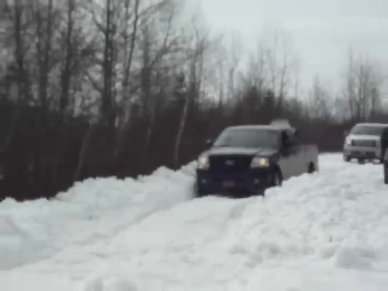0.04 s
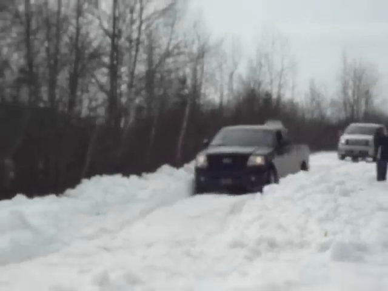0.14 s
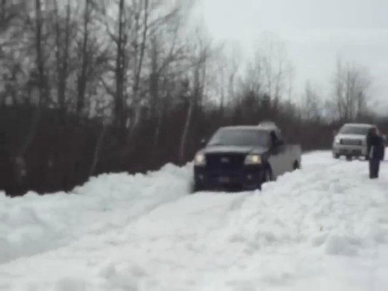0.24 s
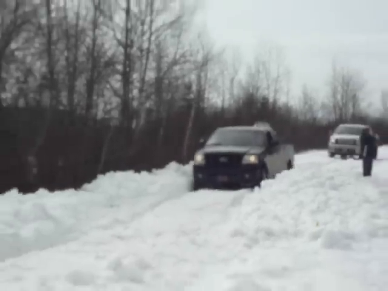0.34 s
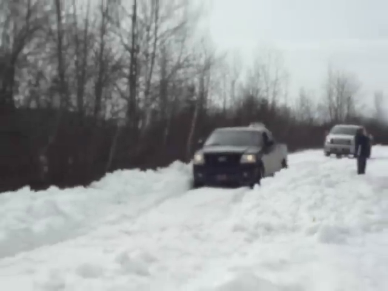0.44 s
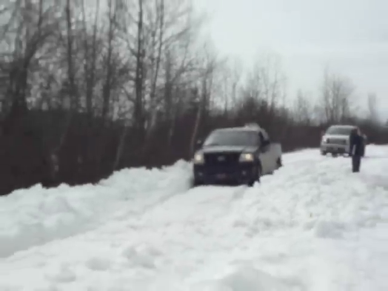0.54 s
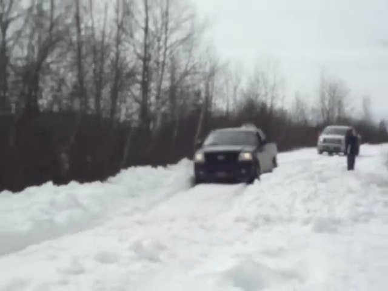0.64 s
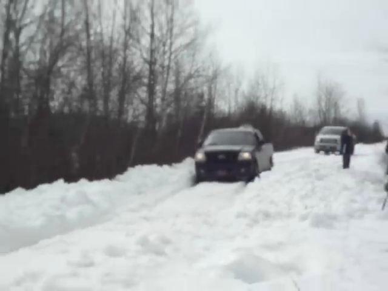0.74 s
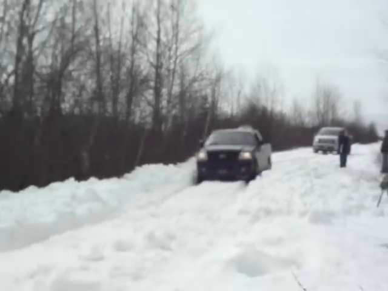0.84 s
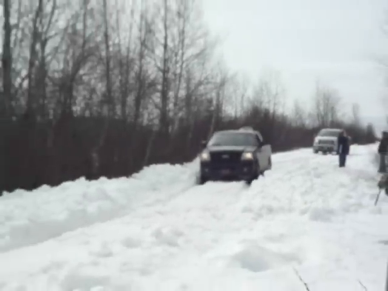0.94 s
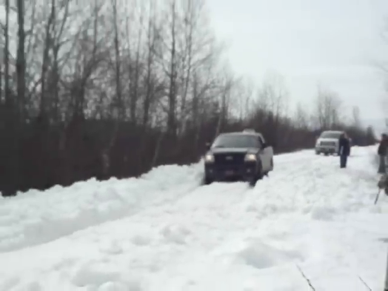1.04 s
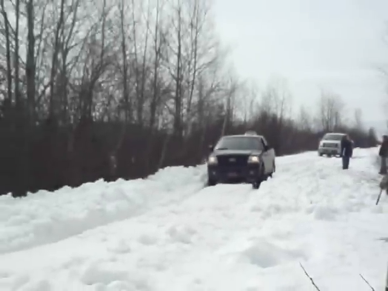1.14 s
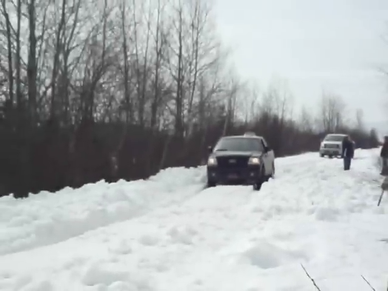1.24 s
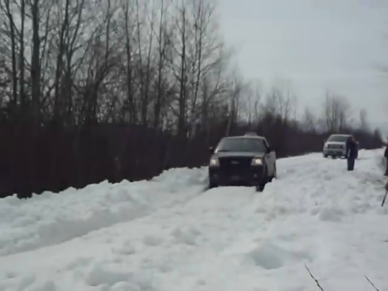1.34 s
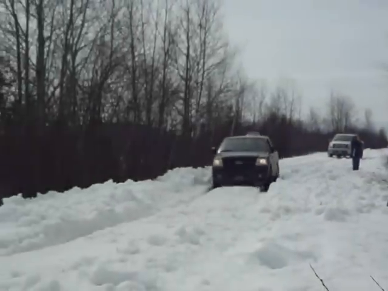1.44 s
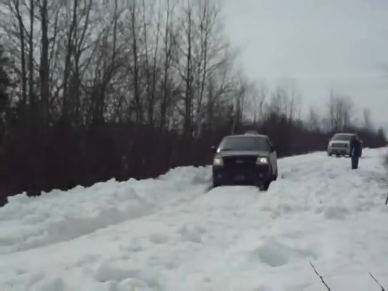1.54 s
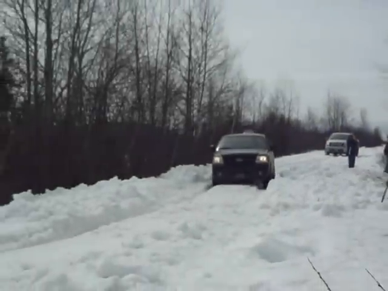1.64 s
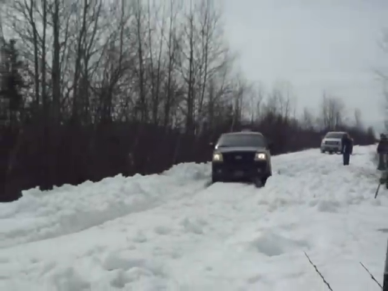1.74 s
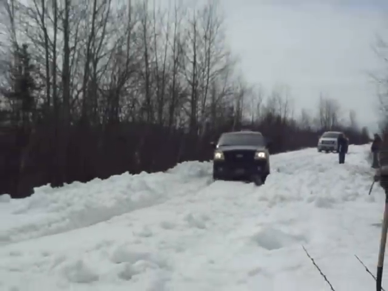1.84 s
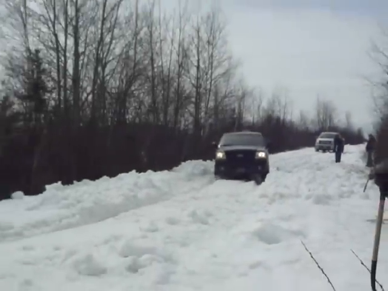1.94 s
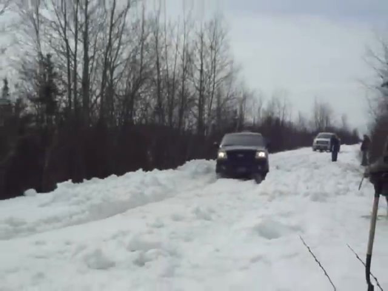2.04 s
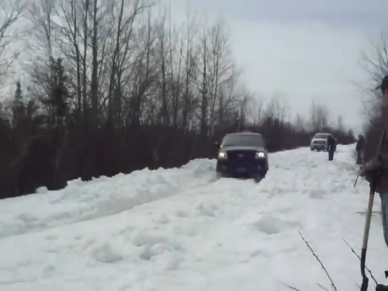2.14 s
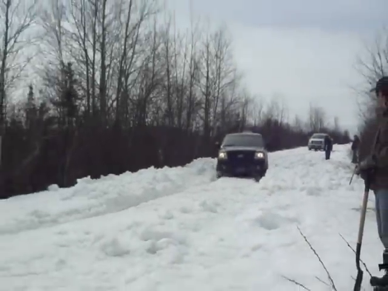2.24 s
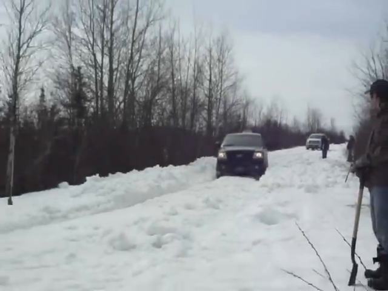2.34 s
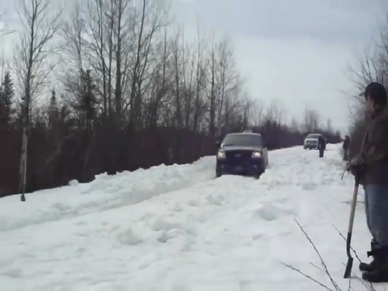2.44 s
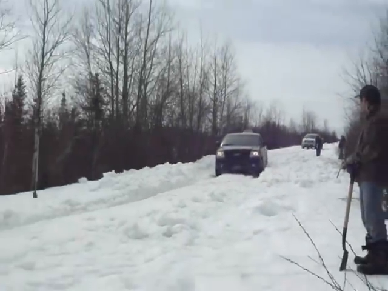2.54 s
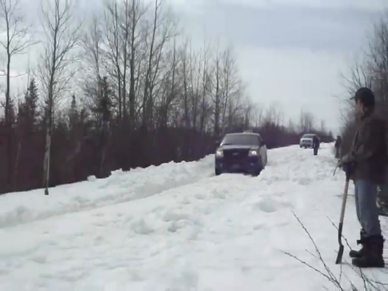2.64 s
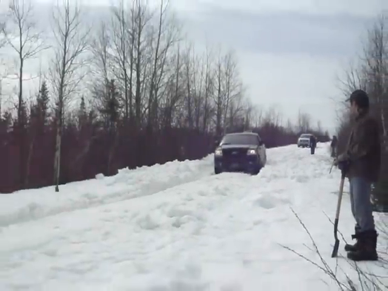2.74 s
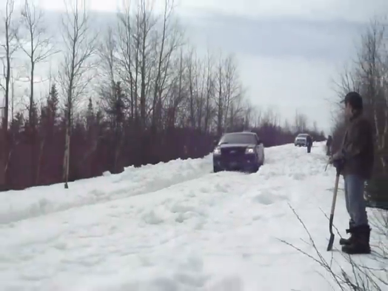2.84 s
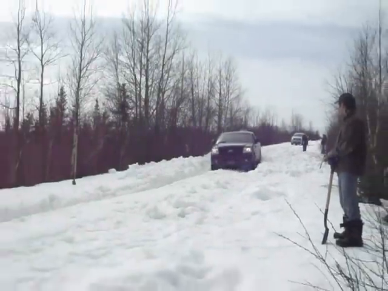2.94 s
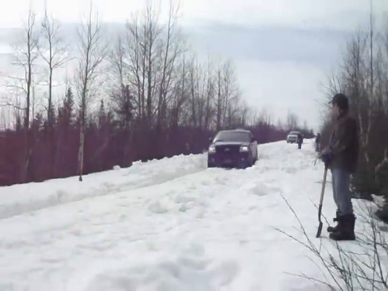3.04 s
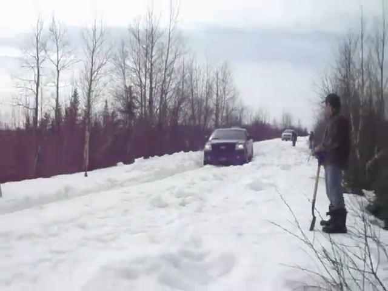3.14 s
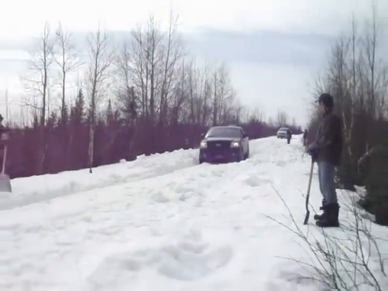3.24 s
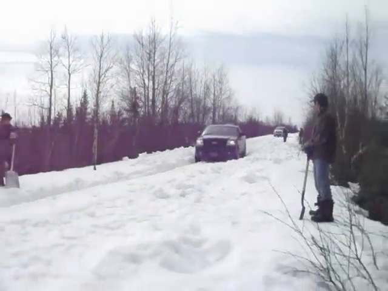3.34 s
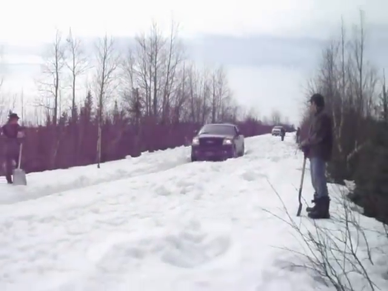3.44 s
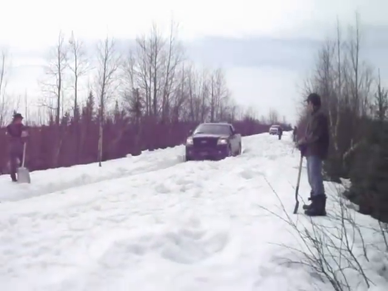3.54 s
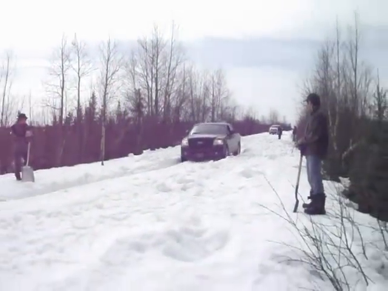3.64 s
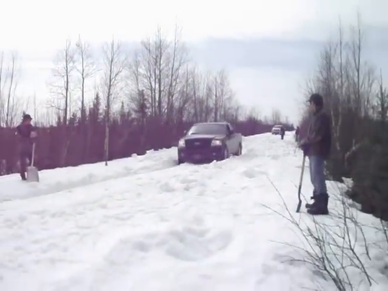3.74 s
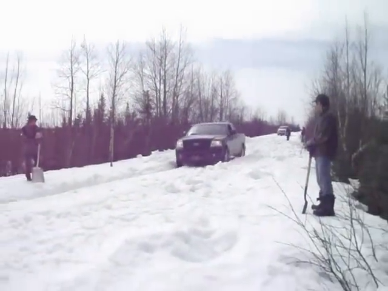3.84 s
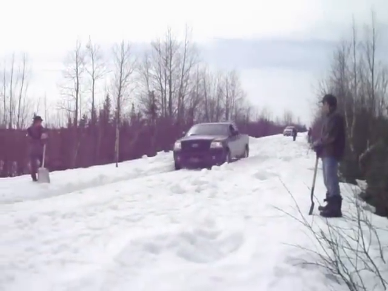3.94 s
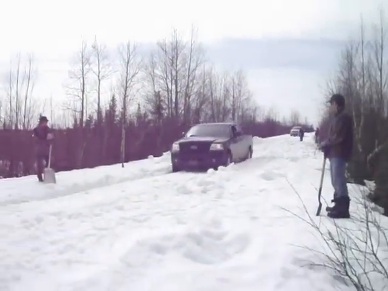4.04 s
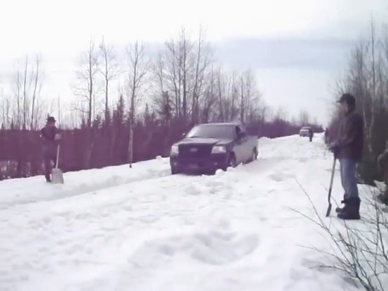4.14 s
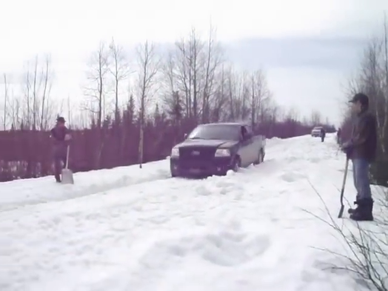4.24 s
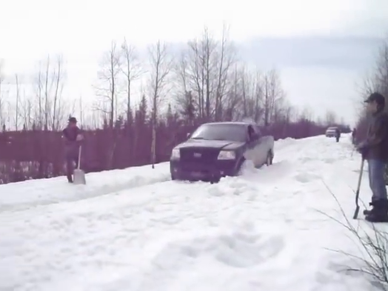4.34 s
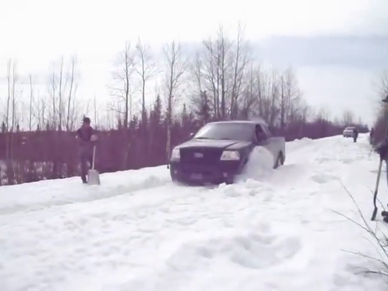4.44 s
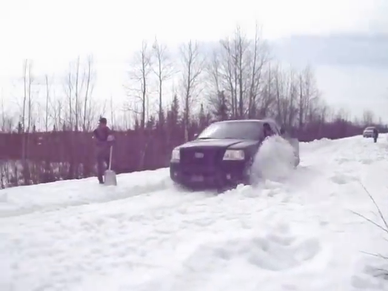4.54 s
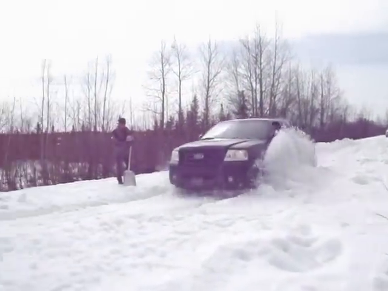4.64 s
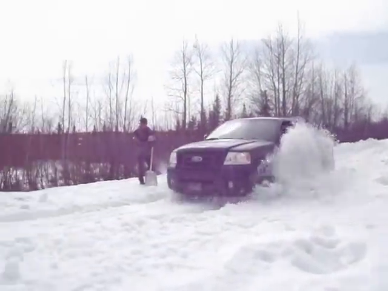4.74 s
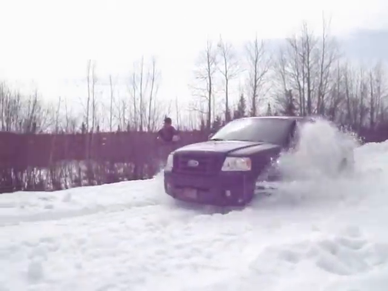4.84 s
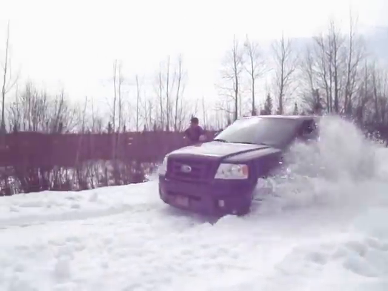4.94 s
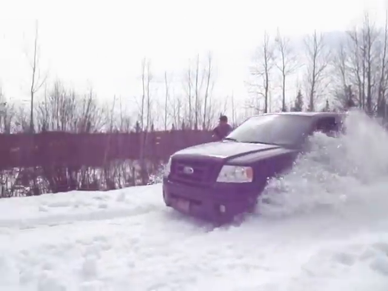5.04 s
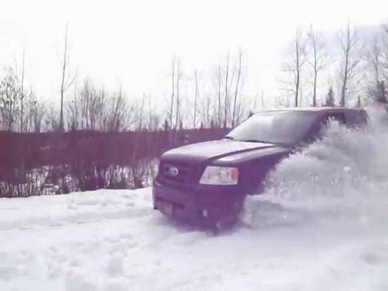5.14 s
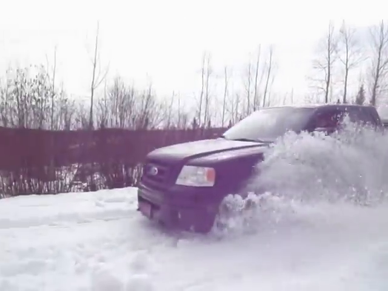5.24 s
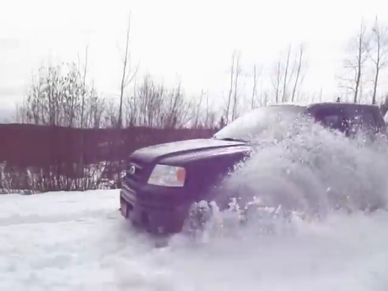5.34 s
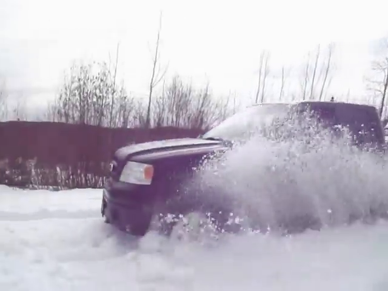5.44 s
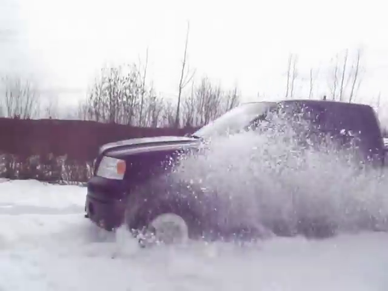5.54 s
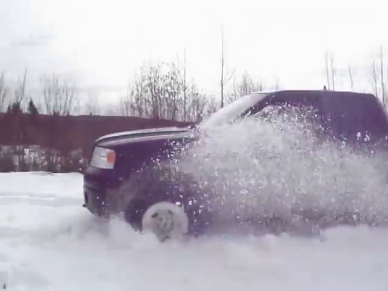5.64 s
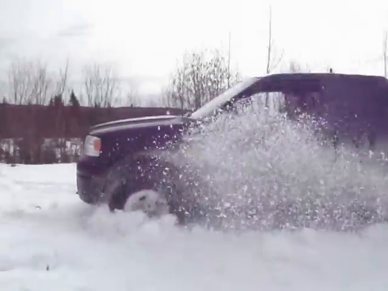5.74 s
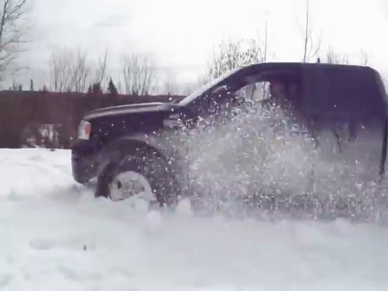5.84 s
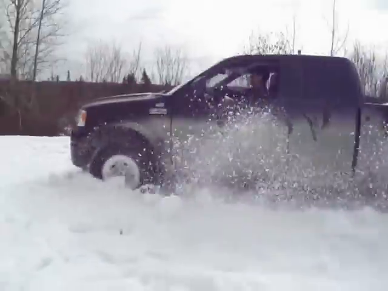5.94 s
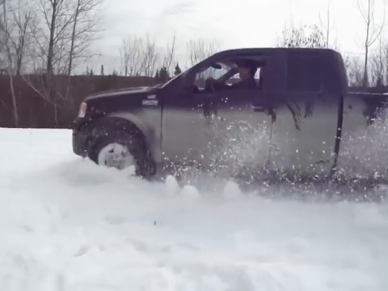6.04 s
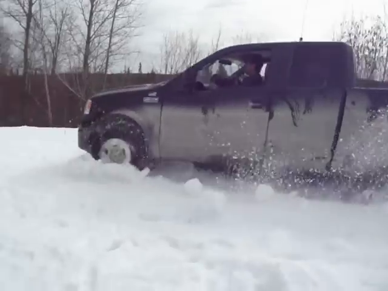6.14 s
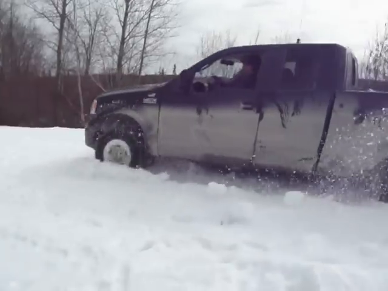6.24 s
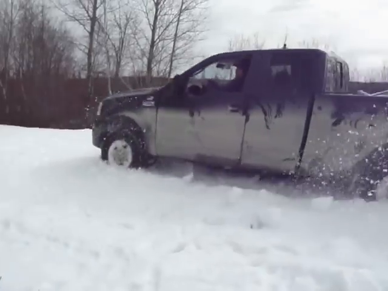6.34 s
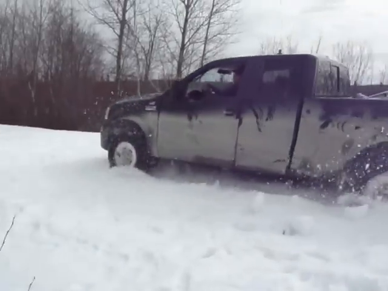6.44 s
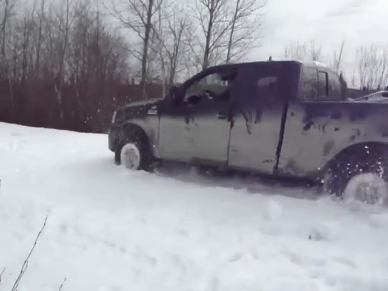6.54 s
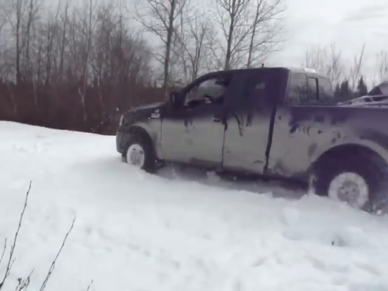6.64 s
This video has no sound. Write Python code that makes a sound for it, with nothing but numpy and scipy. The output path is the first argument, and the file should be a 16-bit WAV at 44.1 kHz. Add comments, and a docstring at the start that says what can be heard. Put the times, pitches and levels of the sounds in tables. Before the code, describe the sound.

A pickup truck's engine drones under load in the distance, heard outdoors through a hand-held camera with a slightly dull sound and a faint whirr. The zoom motor buzzes close up for the first second and again from 1.5 to 3.9 seconds. Small plastic clicks and finger taps come around 1, 1.5, 2.7 to 3.3, and 4 seconds. Meanwhile the engine climbs steadily in pitch and grows louder, reaching its highest note near 4.7 seconds. Low wind buffets the microphone from about 3.8 seconds. Churning, crunching and hissing snow swells, with faint, thin tyre slips around 4.5, 4.8 and 5.7 seconds. The truck passes very close and is loudest from about 5 to 6 seconds. Ice crumbs spatter on the camera at 5.9 seconds, followed by a brief gust. The engine sags in pitch, still close and throaty, until the end near 6.7 seconds.

```python
"""A pickup passing in deep snow

A V8 ploughs close past a hand-held camera, its exhaust harmonics climbing and sagging with the firing
rate. The wheels churn, crush and spray snow as noise and tiny impacts; ice hits the camera and wind
buffets the microphone. The zoom gears buzz twice, and lever and fingers excite the resonances of the case."""
import sys
import numpy as np
from scipy import signal
from scipy.fft import rfft, irfft, next_fast_len
from scipy.io import wavfile

SR = 44100
rng = np.random.default_rng(int(sys.argv[2]) if len(sys.argv) > 2 else 0)


def pcm_store(signal):
    """Save signal as 16-bit PCM."""
    levels = np.round(np.clip(np.atleast_2d(signal), -1, 1) * 32767)
    wavfile.write(sys.argv[1], SR, levels.astype(np.int16).T)


N = 295470
TIME = np.arange(N) / SR
# spectrum of hissing snow: (frequency [Hz], level [dB])
SNOW_HISS = [(900, -20.5), (1500, -9), (1800, -9.5), (2020, -5.5), (2250, -4), (2600, 0), (2900, -0.5),
             (3150, -4.5), (3500, -8.5), (4000, -18), (4500, -25.5), (5000, -36), (6500, -48.5)]


def engine(roughness_db=1.23, octave_db=-13.5):
    """Harmonic series: eight firings a cycle make the note; their unevenness adds other cycle orders."""
    # engine speed: (time [s], firing rate [Hz])
    firing_rate = [(0, 118), (.5, 122), (1.05, 134), (1.6, 137), (2.0, 144), (2.4, 144.5), (2.8, 149.5),
                   (3.37, 153.8), (3.55, 160.5), (3.8, 162), (4.1, 172), (4.35, 172), (4.68, 183),
                   (5.0, 180), (5.45, 180), (6.05, 171), (6.3, 165.5), (6.7, 164)]
    # lope of the two cylinder banks: (order [multiple of the four-stroke cycle], level [dB])
    lope_orders = [(3, 1.5), (5, -1.5), (9, 2), (10, -1.5), (12, -5), (13, -5), (14, -8.5), (15, -8.5)]
    # drones as grille, flank and tailpipe face the camera: (order, time [s], half length [s], level [dB])
    drones = [(30, 3.95, .25, -49), (14, 4.15, .26, -36), (21, 4.2, .22, -45), (35, 4.4, .35, -45),
              (9, 4.92, .26, -32), (11, 5.15, .35, -36), (8, 5.6, .18, -26), (16, 5.7, .2, -36),
              (10, 5.95, .35, -30), (5, 6.2, .35, -22), (3, 6.3, .12, -26), (13, 6.35, .5, -32.5),
              (15, 6.45, .22, -30)]
    # strongest overtones of the engine: (order, level [dB])
    overtones = [(10, -5), (12, -1), (13, -1), (16, -4), (21, -2), (24, -2), (26, 1), (29, -4), (30, -4),
                 (31, -1), (32, -5), (35, -4)]
    # resonances of the pipe and of the panels: (frequency [Hz], bandwidth [Hz], level [dB])
    pipe_modes = [(442, 15, -7), (574, 51, 1.5), (703, 67, 2), (881, 33, 5.5), (1100, 290, -2.5),
                  (1280, 41, -2)]
    panel_modes = [(226, 20, -3), (260, 22, -1), (301, 18, 0), (450, 14, -5), (494, 17, 1.5),
                   (586, 30, -1.5), (638, 30, -1), (690, 20, -1), (758, 40, -1)]
    # radiating points: (behind the nose [m], level [dB], loss per distance doubling [dB], load factor)
    note_source = (3.5, -26.5, 9, 1.22)
    lope_source = (3.5, -25, 12, 1.45)
    rasp_source = (2.7, -26, 16, 0.7)
    whine_source = (1, -9.5, 19, -0.2)
    firing_hz, = in_time(firing_rate)
    cycle_phase = 2 * np.pi * np.cumsum(firing_hz * (1 + 0.00407 * drift(8.0))) / SR / 8
    phases = rng.uniform(0, 2 * np.pi, size=64)

    def partial(order, waver_db):
        """One harmonic of the cycle under slow amplitude modulation; rms 1."""
        tone = np.sin(round(order) * cycle_phase + phases[round(order)])
        return rms_one(from_db(waver_db * drift(2.8)) * tone)

    note = partial(8, waver_db=1.6) + from_db(octave_db) * partial(16, waver_db=3)
    lope = rms_one(sum(from_db(db) * partial(k, waver_db=1) for k, db in lope_orders))
    drone = sum(from_db(db) * swell(s, half) * partial(k, waver_db=1.5) for k, s, half, db in drones)
    # high orders swell as they glide through the resonances
    rasp = rms_one(resonate(sum(partial(k, waver_db=4) for k in np.arange(18, 56)), pipe_modes))
    panel_drive = sum(from_db(db) * partial(k, waver_db=1.5) for k, db in overtones)
    whine = rms_one(resonate(panel_drive, panel_modes))
    burn = from_db(roughness_db * drift(8.4))  # no two cycles burn quite alike
    exhaust = passing(note_source) * note + passing(lope_source) * lope + passing(rasp_source) * rasp
    return burn * (exhaust + drone) + passing(whine_source, beam_power=7) * whine


def passing(source, beam_power=None, pass_s=5.296, speed_m_per_s=4.165, closest_m=3.06):
    """Spreading loss over absorbent snow: gain of a moving point, with load and optional forward beam."""
    # effort of engine and wheels, easing before the charge at the drift: (time [s], level [dB])
    load = [(0, 7), (3, 1), (4, 2), (4.8, 4.5), (5.3, 2.5), (6.1, -2.5), (6.7, 3)]
    load_db, = in_time(load)
    behind_m, closest_db, loss_db, load_factor = source
    to_go_m = behind_m + speed_m_per_s * (pass_s - TIME)  # the nose draws level at pass_s
    distance_m = np.hypot(closest_m, to_go_m)
    facing = np.maximum(to_go_m / distance_m, 0) ** beam_power if beam_power else 1
    return facing * from_db(closest_db - loss_db * np.log2(distance_m / closest_m) + load_factor * load_db)


def snow(crunch_lumps_db=0.2, spray_lumps_db=1.17):
    """Superposed random impacts: tyres churn snow, crush it in uneven lumps and fling a fine spray."""
    # spectra of churning and of crushing: (frequency [Hz], level [dB])
    churn_spectrum = [(45, -11), (80, 1), (125, -3.5), (200, -9.5), (280, -9.5), (420, -19), (800, -29)]
    crunch_spectrum = [(200, 2.5), (450, -5.5), (650, -4), (920, 0), (1150, 1), (1450, -3), (2000, 0),
                       (3000, -21.5), (4000, -26.5), (6500, -49)]
    # radiating points: (behind the nose [m], level [dB], loss per distance doubling [dB], load factor)
    churn_source = (3.5, -21, 11, 1.18)
    crunch_source = (2, -20, 10.5, 1.2353)
    spray_source = (2, -17.5, 10, 1.21)
    # the front wheel bites into the drift: (time [s], half length [s], boost [dB])
    surges = [(5.31, 0.14, 2.6)]
    surge_db = sum(db * swell(s, half) for s, half, db in surges)
    lumps = drift(26)
    churn = coloured(rng.standard_normal(N), churn_spectrum)
    crunch = coloured(grains(per_s=9000, spread_db=2.5), crunch_spectrum)
    crunch *= from_db(surge_db + crunch_lumps_db * lumps)
    spray = coloured(grains(per_s=25000, spread_db=1.5), SNOW_HISS)
    spray *= from_db(surge_db + spray_lumps_db * lumps)
    return passing(churn_source) * churn + passing(crunch_source) * crunch + passing(spray_source) * spray


def tyre_slip():
    """Friction noise drives a resonance: a spinning tyre sings on packed snow."""
    # slips: (time [s], half length [s], level [dB])
    slips = [(4.503, 0.2, -24), (4.814, 0.13, -20), (5.74, 0.11, -22)]
    # singing resonance: (frequency [Hz], bandwidth [Hz], level [dB])
    sing_mode = [(2830, 97, 0)]
    envelope = sum(from_db(db) * swell(s, half) for s, half, db in slips)
    return envelope * coloured(resonate(rng.standard_normal(N), sing_mode), SNOW_HISS)


def ice_hits():
    """Hard impacts excite high modes: flung crumbs of ice shatter on the camera."""
    # impacts: (time [s], level [dB])
    hits = [(5.87, 3.5), (5.8778, 1.5), (5.8849, 1), (5.8929, 2), (5.9038, -4)]
    # their brief ring: (frequency [Hz], bandwidth [Hz], level [dB])
    modes = [(1250, 600, -11), (2450, 600, 0), (2950, 650, -4), (5000, 1200, -17)]
    return struck(hits, modes, soft_hz=5000, crumble=0.02, crumble_s=0.005)


def wind(flutter_db=-0.4):
    """Turbulent pressure at the microphone port makes a low buffeting."""
    # the freshening breeze: (time [s], level [dB])
    breeze = [(0, -46), (.8, -42.5), (2.4, -38.5), (3.65, -29.5), (3.85, -22), (4.6, -21), (6.7, -23)]
    # gusts: (time [s], half length [s], boost [dB])
    gusts = [(5.984, 0.048, 10)]
    # spectrum of the buffeting: (frequency [Hz], level [dB])
    spectrum = [(10, -8), (20, 2), (32, 2.5), (50, -4.5), (75, -7), (120, -31), (300, -37)]
    breeze_db, = in_time(breeze)
    gust_db = sum(db * swell(s, half) for s, half, db in gusts)
    envelope = from_db(breeze_db + gust_db + flutter_db * drift(3))
    return envelope * coloured(rng.standard_normal(N), spectrum)


def zoom_motor(knock_share=0.38, parting_db=-6.5, jitter_s=.00008, ramp_s=.035):
    """Gear meshing: teeth knock as they meet and part, over a steady rub; the body filters the buzz."""
    # motor runs: (start [s], stop [s], tooth rate [Hz], level [dB])
    runs = [(-.1, 1.012, 206, -24.5), (1.546, 3.927, 200, -25.5)]
    # response of the camera body: (frequency [Hz], level [dB])
    body_response = [(500, -40), (850, -27.5), (1150, -16), (1420, -7), (1520, -4), (1750, -5.5),
                     (2000, -1), (2200, -4), (2750, -0.5), (3010, -9), (3180, -7), (3450, -18), (3900, -28),
                     (4400, -22.5), (5000, -40), (6500, -47.5)]
    buzz = 0
    for start, stop, teeth_hz, db in runs:
        running = np.clip(np.minimum(TIME - start, stop - TIME) / ramp_s, 0, 1)
        half_teeth = np.floor(2 * np.cumsum(teeth_hz * (1 + .009 * drift(10))) / SR)
        at = np.flatnonzero(np.diff(half_teeth))
        late = (jitter_s * SR * rng.standard_normal(N)).astype(int)
        knocks = np.zeros(N)
        knocks[np.clip(at + late[at], 0, N - 1)] = from_db(parting_db * (half_teeth[at] % 2))
        gears = np.sqrt(knock_share) * rms_one(knocks) + np.sqrt(1 - knock_share) * rng.standard_normal(N)
        buzz = buzz + running * from_db(db) * coloured(gears, body_response)
    return buzz


def camera_clicks(rub_decay_s=0.0057, rub_db=-14, soft_hz=3900):
    """Modal ringing: a snap and a dying rub excite the case; soft plastic dulls the treble."""
    # single clicks: (time [s], level [dB], rub share [0-1])
    clicks = [(0.921, -3.5, 0.1), (0.957, -1, 0.27), (1.0689, -16, 0.4), (1.0936, -2, 0.38),
              (1.5234, 5.5, 0.09), (1.539, -3, 0.1), (3.2572, -1, 0.13), (4.0183, 2.5, 0.2)]
    # resonances of the case: (frequency [Hz], bandwidth [Hz], level [dB])
    case_modes = [(930, 260, -9), (1243, 163, 4), (1496, 130, 5), (2090, 194, 11.5), (2565, 160, 11),
                  (2730, 183, 10.5), (3250, 150, 0.5), (4300, 140, -11)]
    force, friction = np.zeros(N), rng.standard_normal(N)
    for s, db, rub in clicks + creak_slips():
        at = round(s * SR)
        force[at:] += from_db(db + rub_db) * rub * friction[at:] * np.exp(-TIME[:N - at] / rub_decay_s)
        force[at] += from_db(db)
    softness = signal.butter(4, soft_hz, fs=SR, output="sos")
    ring = signal.sosfilt(softness, resonate(signal.unit_impulse(SR // 20), case_modes))
    return signal.sosfilt(softness, resonate(force, case_modes)) / np.abs(ring).max()


def creak_slips(gap_growth=1.1):
    """Stick-slip friction: each creak is a slowing run of clicks that builds or dies."""
    # creaks: (start [s], slips, first gap [s], first level [dB], change per slip [dB], rub share [0-1])
    creaks = [(1.0739, 4, .0037, -7.5, .5, 0.46), (1.5041, 2, .0027, -7.5, 5.5, 0.05),
              (1.5127, 2, 0.0037, -8, -3, 0.5), (4, 3, .0058, -0.5, -3, 0.37)]
    clicks = []
    for s, slips, gap_s, db, change_db, rub in creaks:
        for k in range(round(slips)):
            clicks.append((s, db + change_db * k, rub))
            s += gap_s * gap_growth ** k
    return clicks


def lever_knock():
    """A heavily damped impact: the zoom lever springs back against its stop."""
    # impact: (time [s], level [dB])
    knocks = [(1.0932, -15.5)]
    # its dull ring: (frequency [Hz], bandwidth [Hz], level [dB])
    modes = [(825, 460, 0)]
    return struck(knocks, modes, soft_hz=1510, crumble=0.015, crumble_s=.004)


def finger_taps():
    """Soft contact favours the lower modes: fingertips shift their grip on the case."""
    # taps: (time [s], level [dB])
    taps = [(.826, -10), (.8885, -10), (2.691, -8), (2.9928, -8.5), (3.291, -8)]
    # their ring: (frequency [Hz], bandwidth [Hz], level [dB])
    modes = [(1230, 210, -0.52), (1600, 180, 0), (2080, 350, 2), (2700, 350, 1)]
    return struck(taps, modes, soft_hz=3000, crumble=0.036, crumble_s=.005)


def camera_whirr(level_db=-34):
    """Stationary filtered noise: the running camera whirrs faintly."""
    # spectrum of the whirr: (frequency [Hz], level [dB])
    spectrum = [(400, -15.5), (1100, -29), (1500, -18.5), (1850, 1.5), (2020, 8), (2150, -4), (2380, 0.5),
                (2620, 2), (2900, -7.5), (3300, -11.5), (3850, -22), (4500, -18), (5500, -24.5),
                (6500, -48)]
    return from_db(level_db) * coloured(rng.standard_normal(N), spectrum)


def struck(hits, modes, soft_hz, crumble, crumble_s):
    """Convolution: impulses with dying noise tails drive the low-passed response of a few modes."""
    force, debris = np.zeros(N), rng.standard_normal(N)
    for s, db in hits:
        at = round(s * SR)
        force[at:] += from_db(db) * crumble * debris[at:] * np.exp(-TIME[:N - at] / crumble_s)
        force[at] += from_db(db)
    softness = signal.butter(3, soft_hz, fs=SR, output="sos")
    ring = signal.sosfilt(softness, resonate(signal.unit_impulse(SR // 50), modes))
    return signal.fftconvolve(force, ring / np.abs(ring).max())[:N]


def resonate(x, modes):
    """Modal superposition: parallel damped resonators of alternating sign."""
    total = 0
    for k, (hz, width, db) in enumerate(modes):
        r = np.exp(-np.pi * width / SR)
        poles = [1, -2 * r * np.cos(2 * np.pi * hz / SR), r * r]
        mode = (1 - r * r) / 2 * signal.lfilter([1, 0, -1], poles, x + 1e-18)
        total = total + (-1) ** k * from_db(db) * mode
    return total


def coloured(x, spectrum):
    """Spectral shaping, falling a further 12 dB per octave beyond both ends; rms 1."""
    hz, db = np.transpose(spectrum)
    size = next_fast_len(N)
    f = np.maximum(np.arange(size // 2 + 1) * SR / size, 1)
    roll_off = np.minimum(f / hz[0], 1) ** 2 * np.minimum(hz[-1] / f, 1) ** 2
    gain = from_db(np.interp(np.log(f), np.log(hz), db))
    return rms_one(irfft(rfft(x, size) * roll_off * gain, size)[:N])


def grains(per_s, spread_db):
    """Shot noise: random impacts, many small and a few large; rms 1."""
    sizes = from_db(spread_db * np.minimum(rng.exponential(1, N), 5)) * rng.choice([-1, 1], N)
    return rms_one(sizes * (rng.random(N) < per_s / SR))


def drift(rate_hz):
    """Slow random fluctuation: noise low-passed at rate_hz; rms about 1."""
    step = 40  # samples between points of the curve
    r = np.exp(-2 * np.pi * rate_hz * step / SR)
    slow = signal.lfilter([1], [1, -2 * r, r * r], rng.standard_normal(N // step + 2002))[2000:]
    return np.interp(np.arange(N) / step, np.arange(len(slow)), rms_one(slow))


def swell(peak_s, half_s):
    """Gaussian envelope of height 1."""
    return np.exp(-((TIME - peak_s) / half_s) ** 2)


def in_time(rows):
    """Linear interpolation in time, one curve per value column."""
    s, *columns = np.transpose(rows)
    return [np.interp(TIME, s, c) for c in columns]


def from_db(db):
    """Decibels to amplitude ratio."""
    return 10 ** (np.asarray(db) / 20)


def rms_one(x):
    """Normalisation to unit power."""
    return x / np.sqrt(np.mean(x ** 2) + 1e-20)


def scene():
    """Superposition of truck, snow and wind with the camera's own sounds, in one channel."""
    whirr = camera_whirr()
    outside = engine() + snow() + tyre_slip() + ice_hits() + wind()
    camera = zoom_motor() + camera_clicks() + lever_knock() + finger_taps() + whirr
    return (outside + camera)[None]


def record(dry, microphone_top_hz=6500, cutoff_hz=15700):
    """Band limiting and clipping: a narrow-band microphone overloads on peaks; the top is then cut."""
    narrow = signal.sosfilt(signal.ellip(8, .3, 80, microphone_top_hz, fs=SR, output="sos"), dry)
    return signal.sosfilt(signal.cheby2(12, 70, cutoff_hz, fs=SR, output="sos"), np.clip(narrow, -1, 1))


dry = scene()
out = record(dry)
pcm_store(out)
```